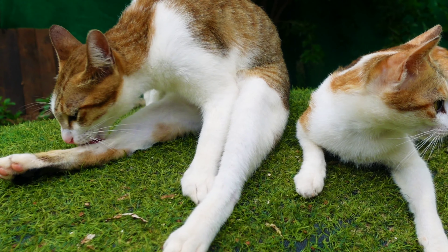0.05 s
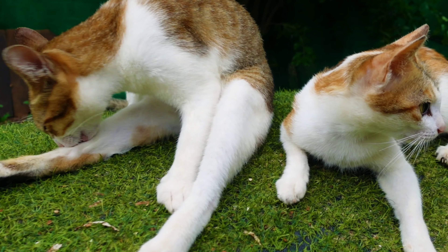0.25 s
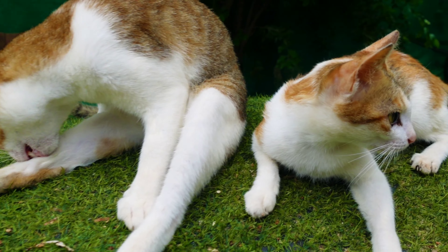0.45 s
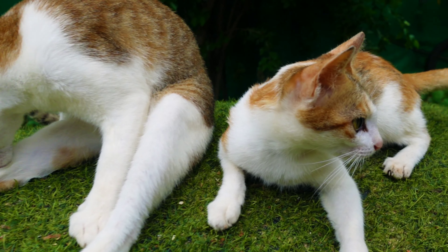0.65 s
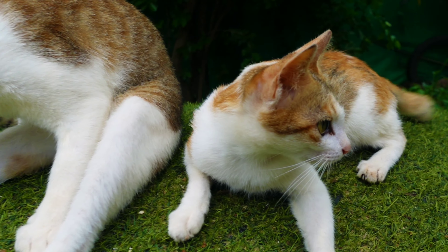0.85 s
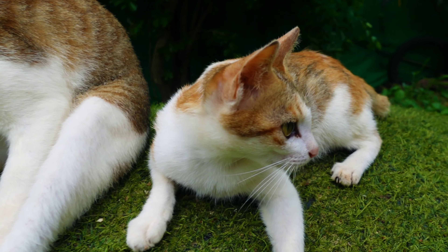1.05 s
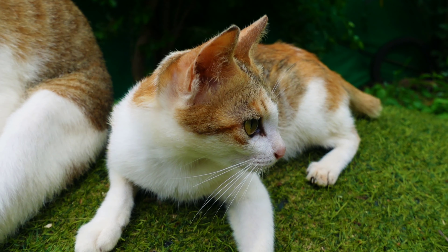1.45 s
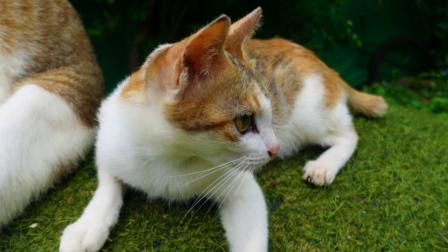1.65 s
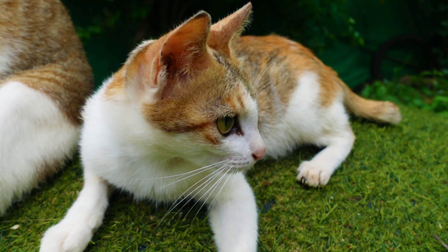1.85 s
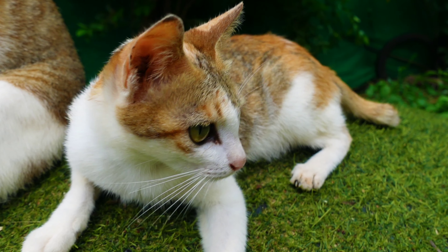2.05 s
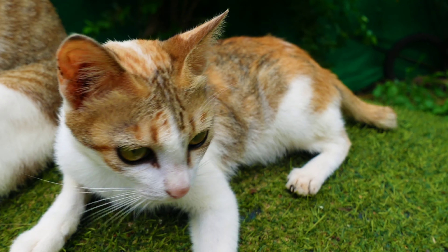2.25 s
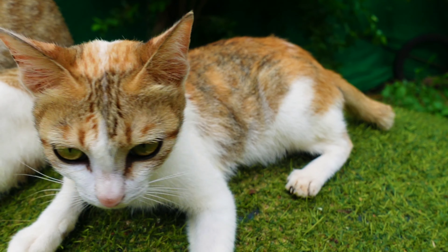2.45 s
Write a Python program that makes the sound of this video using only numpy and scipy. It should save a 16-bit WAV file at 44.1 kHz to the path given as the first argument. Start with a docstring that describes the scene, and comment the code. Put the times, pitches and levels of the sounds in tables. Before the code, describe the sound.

Small birds chirp in a quiet garden. One thin, high call comes from nearby with a soft bump, then fainter chirps follow from farther off over a low outdoor wash and slight hiss.

```python
"""Birds over a quiet garden lawn.

A small bird gives one thin, high call nearby and others chip farther off: frequency-modulated
whistles, scattered by fence and shrubs. A short soft hoot, two soft bumps and a tick sit over
a distant outdoor wash, a rough drone and a faint high hiss, all three made of filtered noise."""
import sys
import numpy as np
from scipy import signal
from scipy.fft import rfft, irfft
from scipy.io import wavfile
from scipy.ndimage import uniform_filter1d

SR = 44100
rng = np.random.default_rng(int(sys.argv[2]) if len(sys.argv) > 2 else 0)


def wav_record(signal):
    """Record a signal, one row per channel, as 16-bit PCM in the file named by sys.argv[1]."""
    frames = np.transpose(np.atleast_2d(signal))
    bounded = np.clip(frames, -1, 1)
    # unit amplitude maps onto the largest positive 16-bit level
    quanta = np.round(bounded * 32767).astype(np.int16)
    wavfile.write(sys.argv[1], SR, quanta)


N = 110250
WASH_SIDE_DB = -2  # side relative to mid
FAR_WAVER_HZ = 915  # rate of the pitch tremble in distant birds


def undb(db):
    """Decibels express an amplitude ratio on a logarithmic scale."""
    return 10 ** (np.asarray(db) / 20)


def unit(x):
    """Normalisation to an rms of 1."""
    return x / np.sqrt(np.mean(x ** 2))


def clock():
    """Uniform sampling: the time of each sample in seconds."""
    return np.arange(N) / SR


def pan(x, db):
    """A level difference between the ears sets direction; positive is left."""
    return x * undb(np.array([[db], [-db]]) / 2)


def widen(mid, side):
    """The sum and difference of mid and side give left and right."""
    return np.array([mid + side, mid - side])


def wander(rate_hz):
    """Smoothing random steps gives a continuous fluctuation of rms 1."""
    hold = max(int(SR / rate_hz), 1)
    steps = rng.standard_normal(N)[np.arange(N) // hold]
    return unit(uniform_filter1d(uniform_filter1d(steps, hold), hold))


def noise(spectrum):
    """Spectral shaping: white noise follows (Hz, relative dB) points and rolls off beyond them."""
    hz, db = np.array(spectrum, float).T
    f = np.maximum(np.fft.rfftfreq(N, 1 / SR), 1)
    gain = undb(np.interp(np.log(f), np.log(hz), db))
    roll_off = np.minimum(f / hz[0], 1) ** 2 * np.minimum(hz[-1] / f, 1) ** 10
    return unit(irfft(rfft(rng.standard_normal(N)) * gain * roll_off, N))


def band(hz, width_hz):
    """A resonance passes the noise near its centre frequency."""
    f = np.maximum(np.fft.rfftfreq(N, 1 / SR), 1)
    detuning = (f - hz ** 2 / f) / width_hz
    return unit(irfft(rfft(rng.standard_normal(N)) / (1 + detuning ** 2), N))


def whistle(hz, waver, rate_hz):
    """Random frequency modulation makes a sine tremble; waver is the rms fraction of its pitch."""
    return np.sin(2 * np.pi * np.cumsum(hz * (1 + waver * wander(rate_hz))) / SR)


def arch(start, length):
    """A half-sine window: returns progress through a note, 0 to 1, and its envelope."""
    progress = np.clip((clock() - start) / length, 0, 1)
    return progress, np.sin(np.pi * progress)


def garden_scatter(x, echo_db, gap_s=0.0046, early_t60_s=0.42, late_t60_s=0.53):
    """Scattering from fence and shrubs adds dense echoes that decay exponentially."""
    t = clock()
    decay = (undb(-60 * t / early_t60_s) + undb(-21 - 60 * t / late_t60_s)) * (t > gap_s)
    mid, side = rng.standard_normal((2, N)) * decay / np.sqrt(np.sum(decay ** 2))
    echoes = signal.fftconvolve(widen(mid, undb(-19) * side), x[None], axes=1)[:, :N]
    return x + undb(echo_db) * echoes


def air(flicker_db=1.08):
    """Uncorrelated side noise gives width to a distant wash and a high hiss; both ease off."""
    # Each row: frequency in Hz, relative spectral density in dB.
    wash_spectrum = [(25, -30), (55, -33), (90, -18), (130, -16), (260, -15.5), (430, -11.5), (620, -9.5),
                     (980, -5.5), (1300, -5), (1550, -5), (1720, -8.5), (2450, -9.5), (3800, -10.5),
                     (5500, -16.5)]
    wash_side_spectrum = [(18, -78), (30, -51), (249, -18), (296, -15), (458, -10), (982, -1), (1170, -1.5),
                          (1520, -4.5), (5500, -13), (7150, -89), (12100, -120)]
    hiss_spectrum = [(4000, -20), (5600, -9), (6400, -4.5), (7200, -3), (7600, 1), (7950, -1.5), (8550, -1),
                     (9100, -7), (9800, -12.5), (15500, -18.5)]
    # Each row: time in seconds, wash level in dB, hiss level in dB.
    levels = [(0, -60.5, -59.5), (.55, -63.5, -62), (.85, -63.5, -61), (1.2, -63.5, -64),
              (1.65, -65, -63.5), (1.95, -63.5, -64), (2.5, -63, -62.5)]
    times, wash_db, hiss_db = np.array(levels).T
    wash = widen(noise(wash_spectrum), undb(WASH_SIDE_DB) * noise(wash_side_spectrum))
    wash *= undb(np.interp(clock(), times, wash_db) + flicker_db * wander(9.58))
    hiss = widen(noise(hiss_spectrum), undb(-8) * noise(hiss_spectrum))
    hiss *= undb(np.interp(clock(), times, hiss_db) + flicker_db * wander(8.67))
    return wash + pan(hiss, db=-2)


def swells():
    """Slow amplitude modulation makes two broad bands of the wash rise and sink."""
    # Each row: time in seconds, level of the low band in dB, level of the high band in dB.
    levels = [(0, -76, -74), (.18, -67, -65), (.4, -69.5, -72), (.57, -66.5, -65), (.72, -76.5, -74),
              (.84, -70, -65), (1.099, -80, -69), (1.4, -72.5, -81), (2.5, -83.5, -90)]
    times, low_db, high_db = np.array(levels).T
    out = 0
    for db, hz, width_hz in [(low_db, 644, 380), (high_db, 2080, 1840)]:
        wide_band = widen(band(hz, width_hz), undb(WASH_SIDE_DB) * band(hz, width_hz))
        out += undb(np.interp(clock(), times, db)) * wide_band
    return out


def band_fading(x, depth_db=1.3, width_hz=220, frame=2048):
    """Frequency-selective fading: narrow bands slowly rise and sink, each on its own."""
    spectra = signal.stft(x, nperseg=frame)[2]
    drift = rng.standard_normal(spectra.shape[-2:])
    drift = uniform_filter1d(drift, size=round(width_hz * frame / SR), axis=0)
    drift = unit(uniform_filter1d(drift, size=12, axis=1))  # smooth over time
    return signal.istft(spectra * undb(depth_db * drift), nperseg=frame)[1][:, :N]


def drone(hz=1002, width_hz=150, drift_hz=25):
    """Beating within a narrow noise band makes a rough, distant drone; its centre drifts."""
    # Each row: time in seconds, level in dB.
    levels = [(0, -79.5), (.4, -66.5), (.65, -67), (1.0, -69), (1.3, -68), (1.48, -66), (1.6, -68.5),
              (1.72, -66), (1.849, -77), (2.1, -69.5), (2.5, -68.5)]
    times, db = np.array(levels).T
    frequency_shift = np.exp(2j * np.pi * np.cumsum(drift_hz * wander(18)) / SR)
    wide_band = widen(band(hz, width_hz), undb(-7) * band(hz, width_hz))
    return undb(np.interp(clock(), times, db)) * (signal.hilbert(wide_band) * frequency_shift).real


def twitter(count=36, low_hz=1432, high_hz=4323, note_s=0.05):
    """Faint notes of many birds far away, where scattered sound outweighs direct sound."""
    duration, out = clock()[-1], 0
    for slot, (when, pitch, glide, softness) in enumerate(rng.random((count, 4))):
        progress, envelope = arch((slot + when) / count * duration, note_s)
        start_hz = low_hz * (high_hz / low_hz) ** pitch
        hz = start_hz * (1 + 0.2 * (2 * glide - 1) * progress)
        out += undb(-84.25 - softness) * envelope * whistle(hz, waver=0.09, rate_hz=FAR_WAVER_HZ)
    return garden_scatter(out, echo_db=8)


def tick(peak_s=1.686, decay_s=0.0008):
    """A noise impulse with an exponential rise and fall is heard as one tiny, bright tick."""
    # Each row: frequency in Hz, relative spectral density in dB.
    spectrum = [(7500, -18), (9600, -2), (11800, 8), (13000, -12)]
    return undb(-52) * noise(spectrum) * np.exp(-np.abs(clock() - peak_s) / decay_s)


def bumps():
    """Soft knocks close by: damped oscillations of a few falling cycles, with a light click."""
    # Each row: start and length in seconds, start and end pitch in Hz, level in dB,
    # level change over the knock in dB, pan in dB, lag of the right side in seconds.
    knocks = [(0.279, 0.00372, 1140, 327, -30, -17.5, 9, 0.00053),
              (2.0895, 0.0074, 677, 223, -47.5, -4.5, 6, 0.00044)]
    out = 0
    for start, length, from_hz, to_hz, db, change_db, pan_db, lag in knocks:
        progress, envelope = arch(start + np.array([[0], [lag]]), length)
        cycles = length * progress * (from_hz + (to_hz - from_hz) * progress / 2)
        thud = np.sin(2 * np.pi * cycles)
        click = undb(-27) * band(hz=2320, width_hz=640)
        out += pan(undb(db + change_db * progress) * envelope * (thud + click), pan_db)
    return out


def hoot():
    """Random amplitude modulation roughens a faint two-tone hoot."""
    # Each row: start in seconds, length in seconds, pitch in Hz, level in dB.
    partials = [(0.202, 0.072, 988, -51), (0.22, 0.041, 561, -58)]
    tones = 0
    for start, length, hz, db in partials:
        _, envelope = arch(start, length)
        tones += undb(db) * envelope ** 0.5 * whistle(hz, waver=0.015, rate_hz=260)
    roughness = 1 + undb(-8) * wander(500)
    return pan(garden_scatter(tones * roughness, echo_db=-21), db=-5.5)


def far_birds():
    """Short gliding chips, blurred by echoes; deeper frequency modulation makes some raspy."""
    # Each row: start and length in seconds, start and end pitch in Hz, waver as a fraction of pitch,
    # level in dB, level change over the note in dB, echo relative to direct sound in dB, pan in dB.
    chips = [(0.62, 0.026, 7100, 4560, .035, -43.5, -25, 3.5, 0.5),
             (0.909, 0.059, 8500, 8600, 0.017, -51, 2, -5.5, -6),
             (0.917, .065, 7970, 7420, .115, -51, -0.5, 0, -2.5),
             (1.305, 0.042, 3070, 3305, 0.077, -67.5, 1, 2, 0),
             (1.555, 0.023, 4450, 3450, 0.088, -65.5, 2, 3, -5),
             (2.135, 0.078, 4510, 3630, .12, -65, -3, 2.5, -2),
             (2.256, 0.059, 3780, 3655, 0.13, -59.5, -3.5, 3, 3.5),
             (2.32, 0.03, 4450, 4460, 0.012, -64, -3, -5, -2),
             (2.339, 0.044, 4640, 4650, 0.0099, -61, -1, -10, 1),
             (2.372, 0.009, 6050, 6470, 0.012, -59, 1, -5, 2),
             (2.381, 0.0108, 6600, 5800, .006, -48.5, 2, -3, 1),
             (2.39, 0.016, 6350, 6500, 0.021, -54, 0, 0, -3),
             (2.388, 0.0202, 5830, 4230, .1, -58.5, -3.5, 7.5, -1)]
    out = 0
    for start, length, from_hz, to_hz, waver, db, change_db, echo_db, pan_db in chips:
        progress, envelope = arch(start, length)
        tone = whistle(from_hz + (to_hz - from_hz) * progress, waver, FAR_WAVER_HZ)
        chip = undb(db + change_db * progress) * envelope * tone
        out += pan(garden_scatter(chip, echo_db), pan_db)
    return out


def near_bird(rasp_hz=1160, rasp_db=-21.5):
    """One whistle sweeps up, holds and droops; sidebands from a fast flutter give a faint rasp."""
    # Each row: time in seconds, pitch in Hz, level in dB.
    contour = [(.201, 5600, -54), (.204, 6000, -44), (.210, 6750, -43), (.214, 7080, -34),
               (.222, 7110, -28), (.227, 7070, -35), (.233, 7000, -30), (.240, 6750, -36),
               (.249, 6480, -41), (.256, 6150, -56)]
    times, hz, db = np.array(contour).T
    t = clock()
    tone = whistle(np.interp(t, times, hz), waver=0.0064, rate_hz=300)
    flutter = 1 + undb(rasp_db) * whistle(rasp_hz, waver=0.268, rate_hz=1500)
    envelope = undb(np.interp(t, times, db)) * (t > times[0]) * (t < times[-1])
    return pan(garden_scatter(tone * flutter * envelope, echo_db=2.5), db=-2)


def scene():
    """Superposition: all sounds reaching the lawn add together."""
    background = band_fading(air() + swells()) + drone() + twitter()
    return background + near_bird() + far_birds() + hoot() + bumps() + tick()


def record(dry):
    """An elliptic low-pass filter cuts the treble above 15.5 kHz."""
    return signal.sosfilt(signal.ellip(10, 0.2, 70, 15500, fs=SR, output="sos"), dry)


dry = scene()
out = record(dry)
wav_record(out)
```